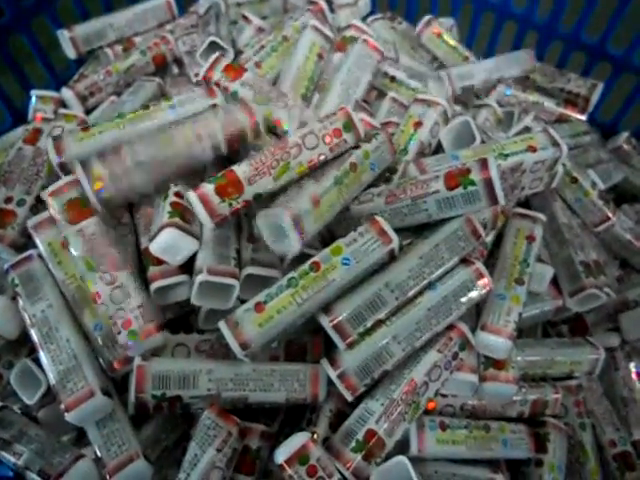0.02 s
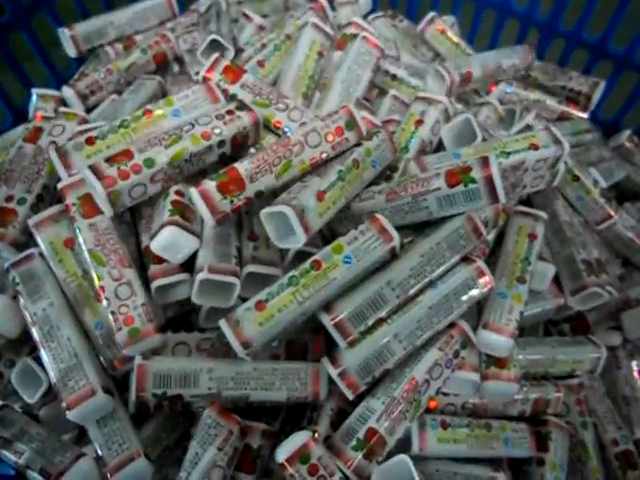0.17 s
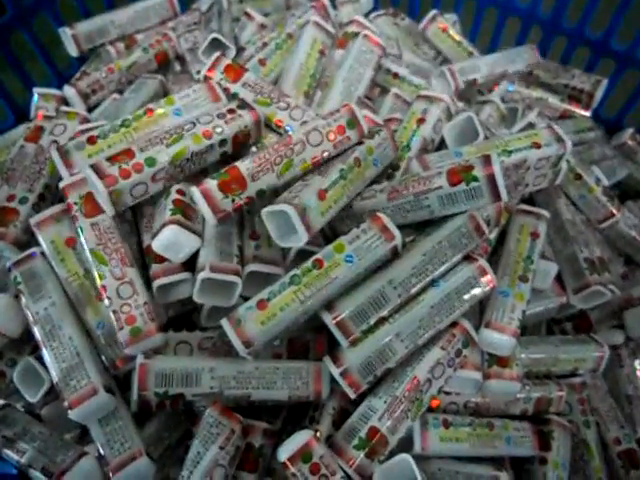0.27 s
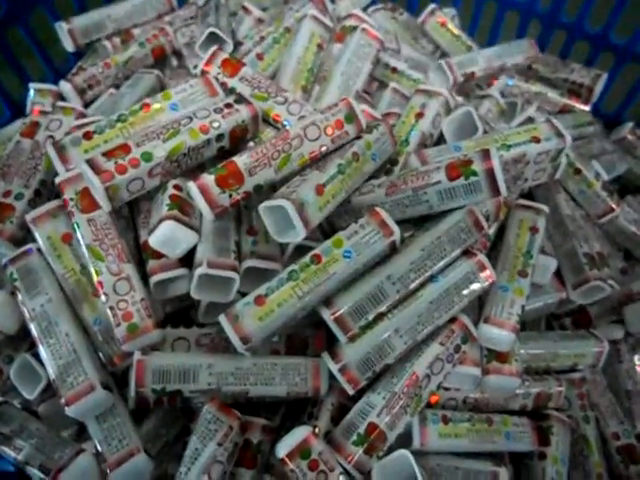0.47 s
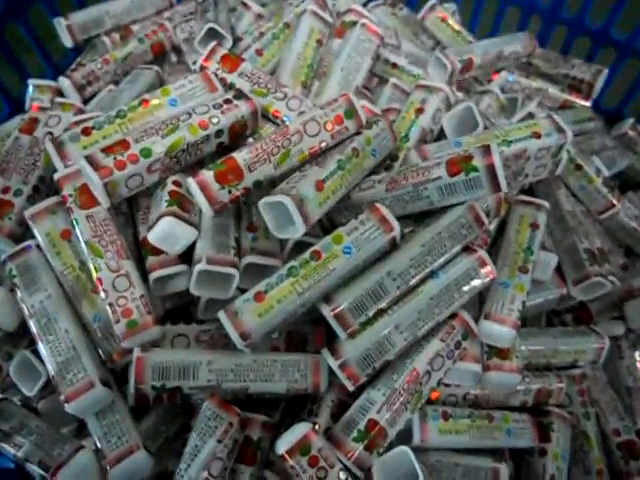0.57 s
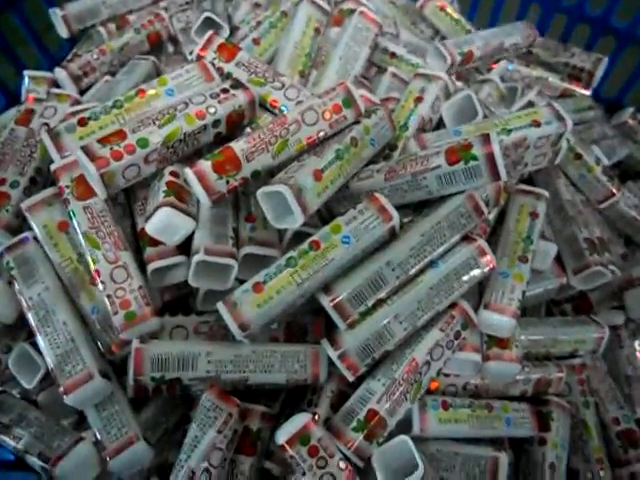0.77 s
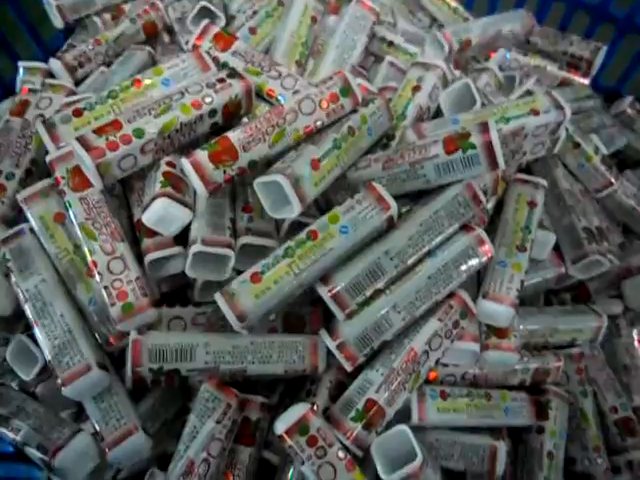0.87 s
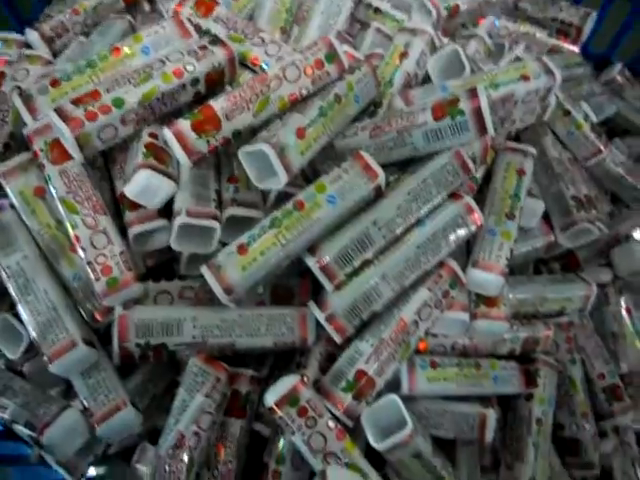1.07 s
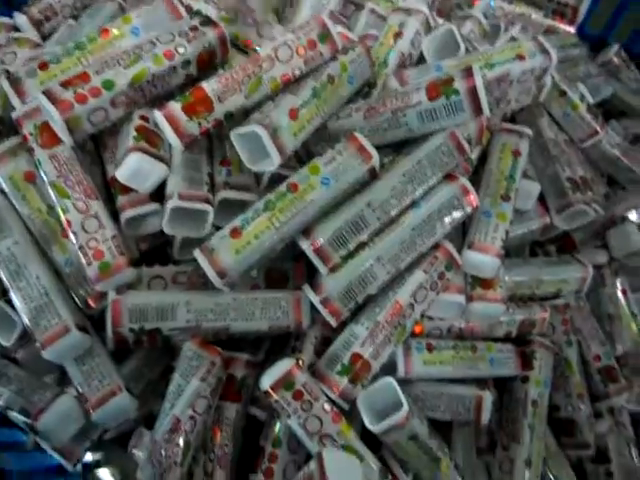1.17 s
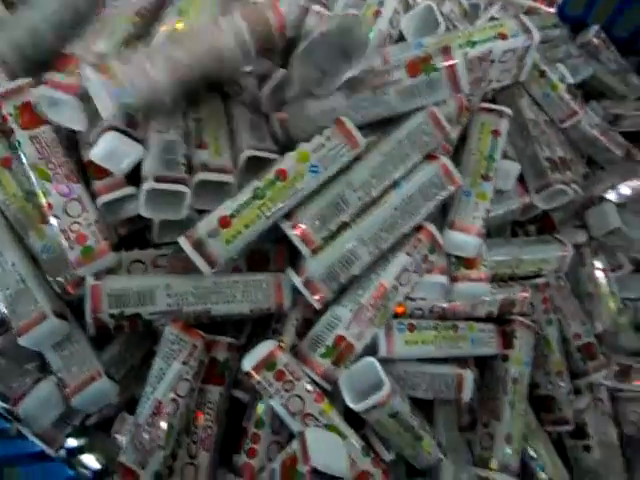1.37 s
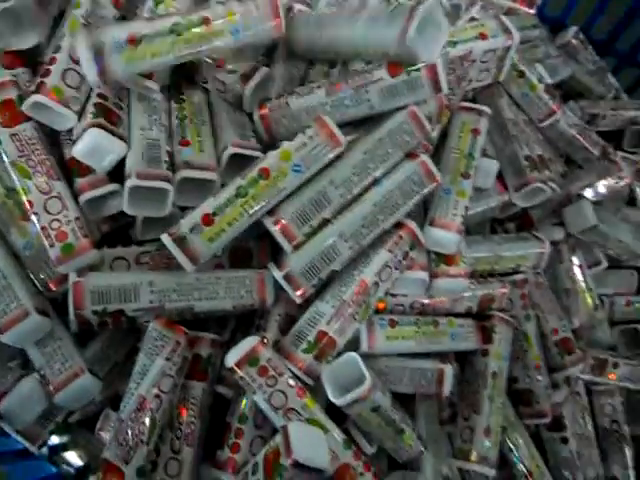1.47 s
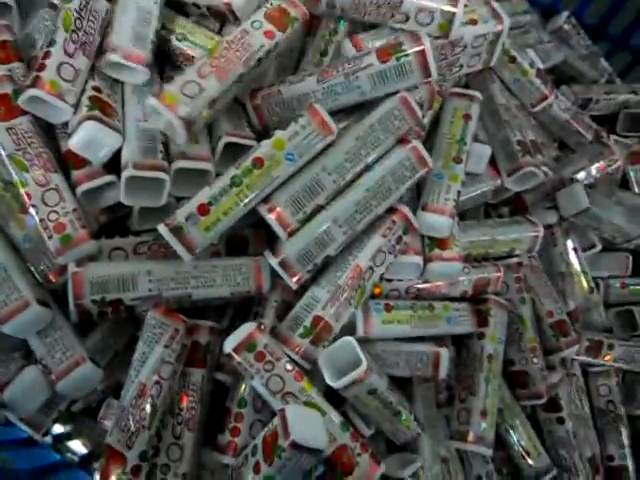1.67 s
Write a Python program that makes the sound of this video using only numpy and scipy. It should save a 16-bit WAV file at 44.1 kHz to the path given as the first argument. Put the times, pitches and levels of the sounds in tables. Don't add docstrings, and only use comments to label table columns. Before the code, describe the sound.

Empty plastic tubes clatter onto a pile right by the microphone, after a second of swelling machine hum, rattle and distant clacks; the machine then drops low beneath the bright hits and stays faint.

```python
import sys
import numpy as np
from scipy import signal
from scipy.fft import rfft, irfft
from scipy.io import wavfile
from scipy.ndimage import uniform_filter1d

SR = 44100
rng = np.random.default_rng(int(sys.argv[2]) if len(sys.argv) > 2 else 0)


def wav_out(sig):
    wavfile.write(sys.argv[1], SR, np.round(np.clip(np.atleast_2d(sig).T, -1, 1) * 32767).astype(np.int16))


def makeup_ratio(level_db):
    decades = np.asarray(level_db, float) / 20
    return 10 ** decades


N = 77175


def read(points, hz):
    f, value = np.transpose(points)
    return np.interp(np.log(hz + 1), np.log(f + 1), value, left=-60)


def evened(x):
    return x / np.sqrt(np.mean(x ** 2) + 1e-20)


def coloured(x, points):
    hz = np.fft.rfftfreq(len(x), 1 / SR)
    return irfft(rfft(x) * makeup_ratio(read(points, hz)), len(x))


def slow(rate_hz):
    size = int(SR / rate_hz)
    once = uniform_filter1d(rng.standard_normal(N), size)
    return evened(uniform_filter1d(once, size))


def add(mix, s, sound):
    part = mix[round(s * SR):][:len(sound)]
    part += sound[:len(part)]


# f/Hz, level/dB
HISS = [(1500, -16), (2500, 6), (4500, 10.5), (6500, 9.5), (8300, 6.5)]


def contact_noise(noise):
    return evened(coloured(noise, HISS))


def chatter(noise, threshold, decay_s, t):
    bounces = np.sign(noise) * (abs(noise) > threshold)
    return bounces * np.exp(-t / decay_s) + (t == 0)


def hollow(hz, db, rise_s, t):
    t60 = 0.021
    return makeup_ratio(db - 60 * t / t60) * np.sin(2 * np.pi * hz * t) * np.minimum(t / rise_s, 1)


# t/s, peak level/dB, hollow f/Hz, hollow level/dB
LANDINGS = [
    (1.0495, -9, 952, 2),
    (1.0986, -0.5, 976, -7.5),
    (1.1022, -10, 694, 4),
    (1.1716, -4.5, 1058, -8.5),
    (1.1747, -15, 1100, -7),
    (1.2105, -4, 1340, -16),
    (1.2142, -8, 640, -5),
    (1.3499, -14.5, 960, -13),
    (1.4688, -8.5, 1360, -10),
]
# f/Hz, width/Hz, level/dB
TUBES = [
    [(1650, 170, 0), (3380, 250, -2), (4020, 260, -11), (4580, 200, 4), (5360, 220, -11), (6580, 240, -7)],
    [(2020, 300, -7.5), (3700, 340, -7.5), (4830, 300, 4), (5400, 253, -6.5), (5850, 150, -10.5),
     (6260, 140, -13.5), (6710, 130, -1.5), (7180, 100, -3.5), (7800, 160, -6.5)],
    [(2880, 110, 9.5), (2220, 470, -6), (4300, 330, -13), (5300, 220, -24)],
    [(2250, 200, -8), (1710, 270, -3.5), (3740, 200, -7), (4590, 310, 1), (5200, 160, -12), (5670, 220, 1),
     (6500, 180, -13), (7060, 210, -9), (7920, 250, -23.5)],
    [(4400, 290, -3), (5270, 160, -2), (7200, 240, -5.5)],
    [(2300, 150, -3.5), (3000, 200, -9.5), (4300, 170, -9), (5060, 200, -4), (5940, 200, -9.5),
     (7250, 140, -1), (7910, 200, -4)],
    [(2300, 230, -6.5), (3610, 250, 1), (4300, 360, -6), (5200, 250, -12), (6330, 150, 0), (7500, 200, -18)],
    [(1900, 190, -1), (2460, 225, -2), (3250, 300, -16), (4150, 340, -8), (4700, 270, -10), (5540, 360, -6),
     (7030, 260, -15)],
    [(1360, 230, -2), (1910, 190, 1), (3190, 140, -1), (4690, 150, 2.5), (6700, 430, -18), (7940, 270, -9)],
]


def landing(start, db, hollow_hz, hollow_db, tube):
    t = np.arange(4096) / SR
    noise, phase = rng.standard_normal((2, 4096)), rng.random(12)
    wall = np.zeros(4096)
    for (hz, width, level), u in zip(tube, phase):
        decay = width * np.exp(-np.pi * width * t)
        wall += makeup_ratio(level) * decay * np.sin(2 * np.pi * (hz * t + .5 * (u > .5)))
    bounce_share, crack_db, crack_s = .22, -11, .022
    blows = bounce_share * chatter(noise[1], 2.2, .003, t)
    blows[0] += 1 - bounce_share
    wall = signal.fftconvolve(wall, blows)[:4096]
    crack = makeup_ratio(crack_db - 60 * t / crack_s) * contact_noise(noise[0])
    struck = (wall / abs(wall).max() + crack) * np.minimum(t / 0.00026, 1)
    delay_s = .0006
    return start + delay_s, makeup_ratio(db) * (struck + hollow(hollow_hz, hollow_db, 0.00069, t))


# t/s, peak level/dB, hollow f/Hz, hollow level/dB, liveliest wall f/Hz
TAPS = [(.3325, -18.5, 1026, 1.5, 4500), (1.0455, -19, 626, 9, 1500), (1.307, -31, 1000, -18, 4300),
        (1.0893, -13, 827, 2.5, 1900), (1.0925, -13, 1100, -2, 4600), (1.1174, -33, 920, 13, 5630),
        (1.1835, -28.5, 1020, 9.5, 4700), (1.1922, -15, 1060, -4, 3700), (1.2224, -15, 1055, -14, 2350),
        (1.2526, -22.5, 1030, -8, 4550), (1.2835, -18.5, 980, -14, 7350), (1.2968, -20, 990, -18, 4710),
        (1.3224, -22, 1030, 0, 2300), (1.3329, -18, 880, -23, 3750), (1.3554, -24, 743, 2, 1900),
        (1.3775, -27, 834, -10, 4600), (1.3884, -25, 800, -11, 3800), (1.4222, -20, 1050, -20, 4060),
        (1.4864, -24.5, 1050, -0.5, 4410), (1.5104, -28, 1150, 0, 1500), (1.5172, -28, 1000, -12, 6600),
        (1.5218, -28, 1000, -1, 4800), (1.531, -27.5, 950, -4, 6800)]
# f/Hz, level/dB
WALL = [(1300, -20), (1750, 1), (1950, -2), (2290, -5), (2750, -11.5), (3170, -6.5), (3600, -1.5),
        (4300, -2.5), (4650, -0.5), (5220, -19), (5850, -26), (6400, -3.5), (7300, -1.5), (7850, -0.5)]


def tap(start, db, hollow_hz, hollow_db, lively_hz):
    t = np.arange(4096) / SR
    draw, noise = rng.standard_normal((len(WALL), 2)), rng.standard_normal((2, 4096))
    lively_db, lively_octaves = 9, 0.19
    wall_t60, treble_damping, spread, vary_db = 0.022, .45, .02, 1.5
    wall = np.zeros(4096)
    for (hz, level), (u, v) in zip(WALL, draw):
        boost = lively_db * np.exp(-(np.log2(hz / lively_hz) / lively_octaves) ** 2)
        fall = 60 * t / wall_t60 * (hz / 2500) ** treble_damping
        wall += makeup_ratio(vary_db * v + level + boost - fall) * np.sin(2 * np.pi * hz * (1 + spread * u) * t)
    wall = signal.fftconvolve(wall, chatter(noise[1], 1.8, 0.0014, t))[:4096]
    crack_db, crack_s = -0.5, 0.02
    crack = makeup_ratio(crack_db - 60 * t / crack_s) * contact_noise(noise[0])
    struck = (wall / abs(wall).max() + .5 * crack) * np.minimum(t / 0.00052, 1)
    delay_s = .0006
    return start + delay_s, makeup_ratio(db) * (struck + hollow(hollow_hz, hollow_db, 0.00055, t))


def heap(x):
    level_db, t60 = -8.5, 0.043
    t = np.arange(6000) / SR
    tail = rng.standard_normal(6000) * makeup_ratio(-60 * t / t60) * (t > .001)
    return makeup_ratio(level_db) * signal.oaconvolve(x, tail / np.linalg.norm(tail))[:N]


# t/s, level/dB, low thud level/dB, length/s
STROKES = [(0.2735, -28, 14, 0.032), (0.313, -22, 5, 0.056), (0.3342, -9, 3, 0.096), (0.385, -6, -2, 0.05),
           (0.562, -10.5, 2, 0.037), (0.652, -15, 9, 0.02), (0.718, -11.5, -4.5, 0.051),
           (0.832, -25, -4, 0.06), (0.91, -26, 2, 0.04), (0.9607, -8, 3, 0.035), (1.05, -9, 7, 0.13)]
# f/Hz, level/dB
STROKE = [(150, -18), (400, -4.5), (1200, 5.5), (2000, -12)]


def stroke(start, db, thud_db, length):
    t = np.arange(8192) / SR
    a, b = rng.standard_normal((2, 8192))
    burst_rise_s, thud_rise_s, thud_s = .005, 0.0015, 0.026
    burst = np.minimum(t / burst_rise_s, 1) * makeup_ratio(-20 * t / max(length, .005)) * contact_noise(a)
    thud = np.minimum(t / thud_rise_s, 1) * makeup_ratio(thud_db - 20 * t / thud_s) * evened(coloured(b, STROKE))
    return start - .003, 0.33 * makeup_ratio(db) * (burst + thud)


# t/s, length/s, level/dB, f/Hz
RINGS = [(.2, .1, -34, 890), (.615, .09, -21.5, 1315), (.642, .03, -31, 1572), (.7, .025, -27, 630),
         (.07, .09, -38, 190), (.69, .06, -27, 193), (.325, .03, -28, 340), (1.04, .022, -21, 420),
         (.345, .07, -30, 900), (1.68, .07, -42, 190), (1.099, .011, -24, 650), (.89, .06, -24, 195),
         (.975, .032, -25, 1128), (.988, .054, -21.5, 1257), (.952, .03, -26, 1290),
         (1.232, .046, -34, 1035), (1.28, .09, -42, 190)]


def ring(start, length, db, hz):
    width_hz, fuzz = 20, .15
    t = np.arange(8192) / SR
    size = int(SR / width_hz / 2)
    a, b = uniform_filter1d(rng.standard_normal((2, 8192)), size, axis=1) * np.sqrt(size)
    swell = np.sin(np.pi * np.clip(t / length, 0, 1)) ** .5
    tone = (1 + fuzz * (a + 1j * b)) * np.exp(2j * np.pi * hz * t)
    return start, np.sqrt(2) * makeup_ratio(db) * swell * tone.imag


# t/s, level/dB, shaft throb level/dB, second order level/dB
GAIN = [(0.0, -44, -36, -61), (0.092, -36, -45, -35), (0.164, -32, -49, -40.5), (0.215, -33, -39.5, -45.5),
        (0.346, -23.5, -32, -33), (0.442, -27, -28, -30), (0.53, -23, -31, -39), (0.667, -23, -28, -29.5),
        (0.736, -23, -29, -30.5), (0.794, -21.5, -41, -38), (0.882, -20.5, -29, -31.5),
        (1.028, -18.5, -21.5, -29.5), (1.09, -26.5, -41, -35.5), (1.188, -35.5, -42.5, -45.5),
        (1.378, -36, -49.5, -44), (1.496, -37.5, -41, -53), (1.588, -39, -38, -38.5),
        (1.75, -38, -40, -50.5)]


def control(col):
    table = np.array(GAIN)
    return np.interp(np.arange(N) / SR, table[:, 0], table[:, col])


# f as multiple of shaft speed, level/dB over machine
ORDERS_UP = [(3, -15), (4, -17), (5.2, -26.5)]


def motor():
    shaft_hz, waver_db = 48.27, 3
    turns = np.cumsum(shaft_hz * (1 + .01 * slow(8.5))) / SR
    out = np.zeros(N)
    for k in (1, 2):
        out += np.sqrt(2) * makeup_ratio(control(k + 1)) * np.sin(2 * np.pi * (k * turns + rng.random()))
    for k, db in ORDERS_UP:
        level_db = control(1) + db + waver_db * slow(4.8)
        out += makeup_ratio(level_db) * np.sin(2 * np.pi * (k * turns + rng.random()))
    return out


def rattle():
    level_db, rate_hz, spread_db, t60 = -17, 680, 7, 0.011
    size = makeup_ratio(spread_db * np.minimum(rng.exponential(1, N), 4)) * (rng.random(N) < rate_hz / SR)
    kind, t, out = rng.integers(0, 16, N), np.arange(600) / SR, np.zeros(N)
    for k, hz in enumerate(np.geomspace(600, 7000, 16)):
        tick = makeup_ratio(-60 * t / t60) * np.sin(2 * np.pi * hz * t) * (600 / hz) ** 0.2
        out += signal.oaconvolve(size * (kind == k), tick)[:N]
    return makeup_ratio(level_db) * evened(out)


# f/Hz, level/dB per Hz
ROAR = [(20, -27.5), (45, -2.5), (140, -3), (520, -6.5), (900, -4), (1380, -5), (1950, -15), (4280, -16.5),
        (8300, -21)]


def roar():
    level_db, patchy_db, flicker_db = 0.5, 1.57, 1
    frames = N // 128 + 5
    a, b, patches = rng.standard_normal((frames, 257, 3)).T
    patches = uniform_filter1d(patches, size=4, axis=0)
    patches = evened(uniform_filter1d(patches, size=12, axis=1))
    flicker = evened(uniform_filter1d(rng.standard_normal(frames), size=4))
    z = (a + 1j * b) * makeup_ratio(patchy_db * patches + flicker_db * flicker)
    noise = signal.istft(z, nperseg=512, noverlap=384)[1][:N]
    return makeup_ratio(level_db) * evened(coloured(noise, ROAR))


def scene():
    far, near = np.zeros(N), np.zeros(N)
    for row, tube in zip(LANDINGS, TUBES):
        add(near, *landing(*row, tube))
    for row in TAPS:
        add(near, *tap(*row))
    for row in STROKES:
        add(far, *stroke(*row))
    for row in RINGS:
        add(far, *ring(*row))
    machine = makeup_ratio(control(1)) * (roar() + rattle()) + motor()
    return (machine + far + near + heap(near))[None]


# t/s, length/s, lower f/Hz, upper f/Hz, share of bands lost (0-1)
DROPOUTS = [(1.437, .024, 5100, 7800, 1), (1.437, .024, 3000, 4100, 1), (1.455, .006, 2200, 8400, .97),
            (1.437, .006, 3900, 5300, .97), (1.234, .014, 3800, 7800, .7), (1.157, .008, 4300, 7800, .7),
            (1.198, .007, 3000, 8400, .7), (.06, .03, 7000, 7900, .8), (1.179, .012, 3000, 7800, .2),
            (0, .11, 4500, 7800, .35), (.66, .05, 5500, 7800, .2), (1.25, .18, 4500, 7800, .15),
            (1.49, .09, 5000, 7800, .1)]


def dropouts(x):
    hz, t, z = signal.stft(x, SR, nperseg=256, noverlap=192)
    draw = rng.random((len(t) // 6 + 1, 33))
    draw = np.repeat(np.repeat(draw, 6, axis=0), 4, axis=1).T[:len(hz), :len(t)]
    lost = np.zeros(draw.shape, bool)
    for start, length, above_hz, below_hz, share in DROPOUTS:
        band = (hz[:, None] > above_hz) & (hz[:, None] < below_hz)
        lost |= (draw < share) & band & (t > start) & (t < start + length)
    lost_db = -37
    return signal.istft(z * makeup_ratio(lost_db * lost), SR, nperseg=256, noverlap=192)[1][:, :N]


def roll_off(x):
    return signal.sosfilt(signal.butter(12, 9040, fs=SR, output="sos"), x)


def record(dry):
    edge_hz = 7996
    lowpass = signal.firwin(301, edge_hz, window=("kaiser", 9), fs=SR)
    x = signal.oaconvolve(dropouts(dry), lowpass[None], "same")
    mix = np.clip(x, -.95, .95)
    return roll_off(mix)


dry = scene()
out = record(dry)
wav_out(out)
```